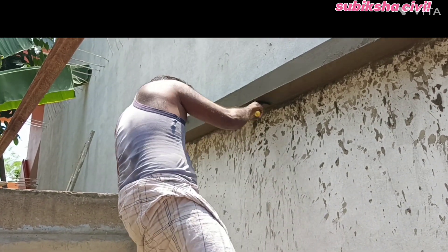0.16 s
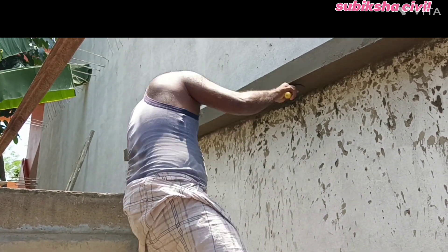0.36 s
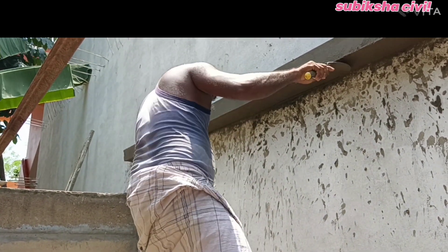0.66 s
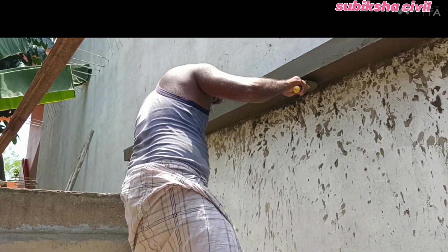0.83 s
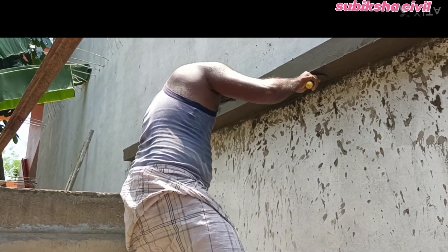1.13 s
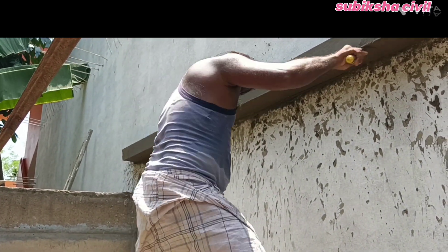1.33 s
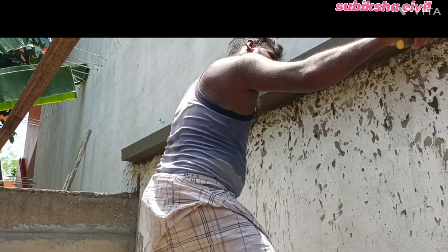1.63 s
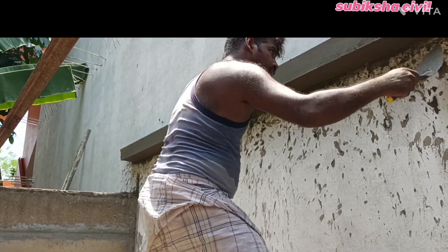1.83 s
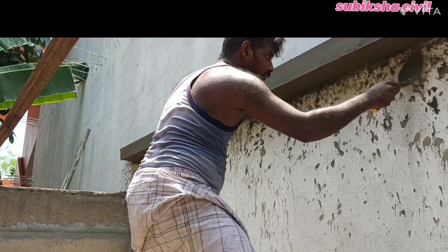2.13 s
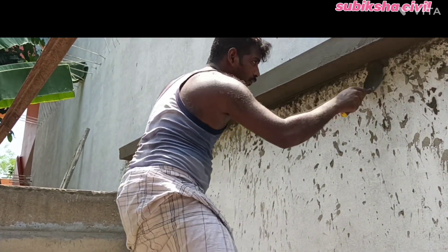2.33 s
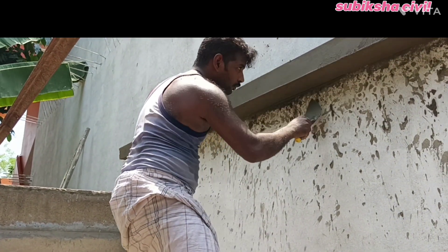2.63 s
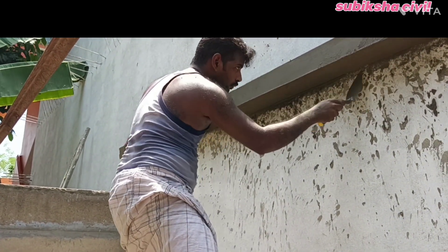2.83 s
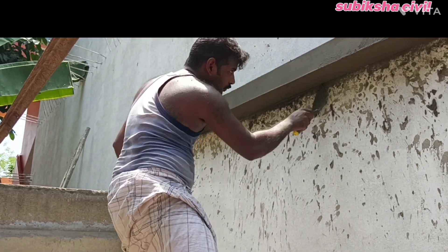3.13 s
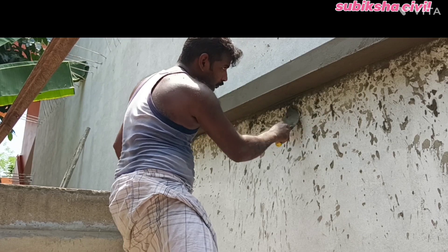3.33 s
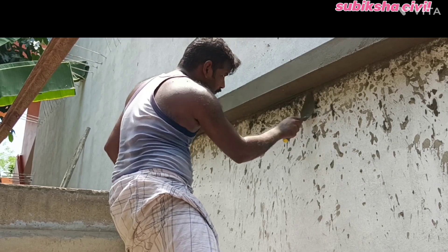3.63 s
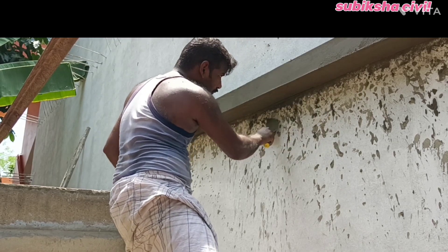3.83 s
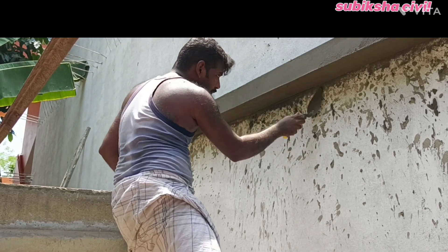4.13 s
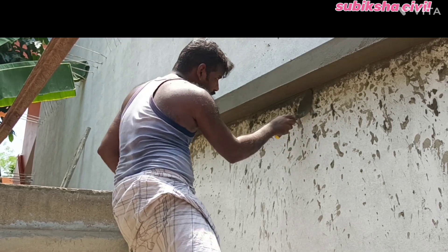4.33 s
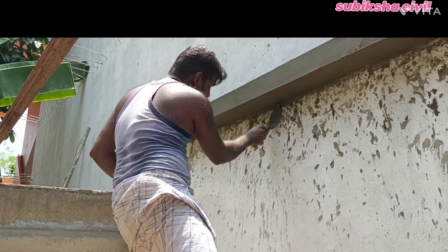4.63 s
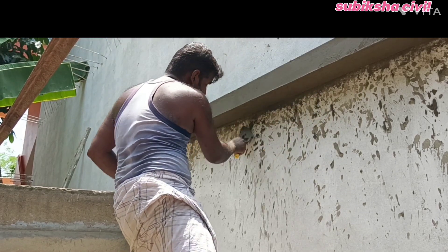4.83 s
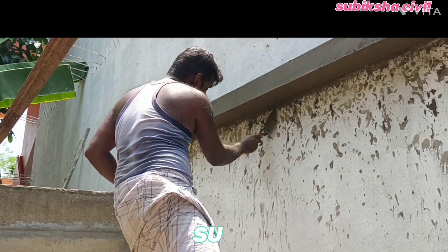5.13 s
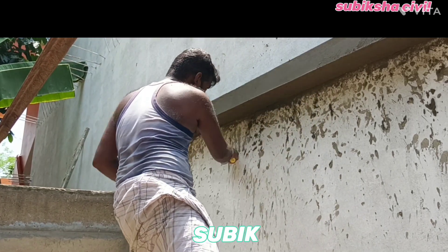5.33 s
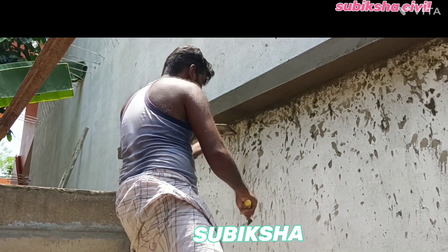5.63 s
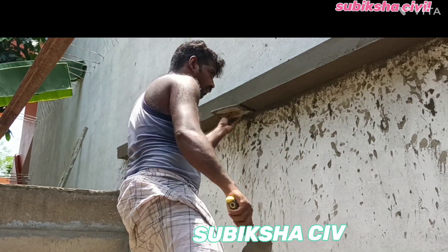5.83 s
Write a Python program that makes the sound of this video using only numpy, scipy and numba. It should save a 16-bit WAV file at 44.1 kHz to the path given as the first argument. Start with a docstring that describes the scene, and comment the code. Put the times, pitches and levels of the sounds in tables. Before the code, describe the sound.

A steel trowel rasps and rings over wet plaster in repeated strokes, while a motorbike passes near the end.

```python
"""One rasping scrape after another: a mason spreads cement plaster on an outdoor wall with a steel float.
Sand grains crackle under the blade; laid flat it hisses, set on its edge it taps and rings.
Lumps of wet mortar crunch softly, and the nearby walls add a short echo.
A single-cylinder motorbike comes up the street, its exhaust barking with each firing, then booming
as the throttle shuts. Far traffic hums underneath."""
import sys
import numpy as np
from scipy import signal
from scipy.fft import rfft, irfft, next_fast_len
from scipy.io import wavfile
from scipy.ndimage import uniform_filter1d, map_coordinates
from numba import njit

SR = 44100
rng = np.random.default_rng(int(sys.argv[2]) if len(sys.argv) > 2 else 0)


def wrap_up_sound(samples):
    """Save the sound to the file named by the first command line argument, as 16-bit audio."""
    columns = np.atleast_2d(samples).T
    # keep every value between -1 and 1, then stretch to whole-number steps
    tamed = np.clip(columns, -1, 1)
    steps = np.round(tamed * 32767).astype(np.int16)
    wavfile.write(sys.argv[1], SR, steps)


N = 263718

# the free blade's modes (the tones it rings at): f/Hz, level/dB, t60/s (time to fade by 60 dB)
BLADE_MODES = [(1194.6, -1, 0.19), (1904, -9.5, 0.18), (2020, -12.5, 0.19), (2770, -19, 0.055),
               (3350, -21, 0.09), (3900, -16, .04)]


def strokes():
    """Sand under the blade hisses and sets the steel ringing; the hand's pressure sets both."""
    # hiss of the sand: f/Hz, level/dB
    sand_spectrum = [(500, -49), (1000, -4), (2000, -27), (3500, 1), (4600, 5), (5400, 3.5), (7300, 5),
                     (9000, 2), (12000, 5), (15700, 4)]
    # sizzle of the finest sand: f/Hz, level/dB
    fine_spectrum = [(6000, -42), (9500, -16), (12500, -22), (14000, 0), (15700, 0)]
    # modes of the blade laid flat: f/Hz, width/Hz, level/dB, share of the bending (0-1)
    flat_modes = [(220, 87, -4.5, 0), (451, 120, -2.5, 0), (670, 134, -8.5, .3), (1200, 62, 3.5, 1),
                  (1505, 95, 0.5, 0.8), (1740, 210, -4, .3), (1974, 70, 6, 0.1), (2440, 460, -1, 0.8),
                  (3070, 340, -1, 0), (3320, 66, 6.5, 0.4), (3630, 90, -2, 0.3), (4260, 120, -2, 0.3)]
    # modes of the blade on its edge: same columns
    edge_modes = [(222, 55, -10, 0), (415, 128, -15, 0), (770, 170, -9, 0.93), (1195, 48, 4, 0.98),
                  (1495, 44, 4.3, 0.98), (1975, 54, 7.6, 0.3), (2210, 167, 1.5, 0), (2620, 344, -3.5, 0),
                  (2820, 250, -1, 0.42), (3250, 137, 1, 0.14), (3600, 270, -9.5, 0.13),
                  (3950, 150, 0, 0.49)]
    hiss_db, ring_db, flex, sizzle_db, tip_db = hand()
    sand = grit()
    coarse = coloured(patchy(sand, depth_db=2.6), sand_spectrum)
    spurts = patchy(grit(), depth_db=2.6) * amp(2.6 * wobble(70))
    rasp = coarse + amp(sizzle_db) * coloured(spurts, fine_spectrum)
    flat_ring = amp(2.5) * blade(sand, flat_modes, flex, tip_db)
    edge_ring = amp(1.0) * blade(sand, edge_modes, flex, tip_db)
    ring = np.where(np.arange(N) / SR < 2.0, flat_ring, edge_ring)  # flat for the first 2 s
    tremor = amp(0.8 * wobble(35))  # the hand never presses quite evenly
    return tremor * (amp(hiss_db + 2) * rasp + amp(ring_db) * ring)


def hand():
    """Each stroke lands, grips, pushes and lets go; gives curves of hiss, ring, flex, sizzle and tip."""
    # strokes: t/s, rise/s, push/s, landing/dB, grip/dB, end of push/dB, mid-push swell/dB,
    # release/(dB/s), ring boost/dB, pitch rise from bending/Hz, sizzle/dB, freedom of the tip/dB
    moves = [ (0.355, 0.253, 0.333, -45, -27.8, -27, -5, 260, -8, 64, 1, -0.5),
             (1.383, 0.179, 0.289, -46, -33, -32.5, 5.2, 245, -10, 64, -2, -2),
             (2.435, 0.025, 0.496, -42, -31.6, -27.8, 1.3, 298, -1, 72, -8, 1.5),
             (3.255, 0.067, 0.319, -38, -30.3, -25.8, 1.5, 244, 0.3, 74, -14, 0.5),
             (3.912, 0.1, 0.178, -54, -31, -25, 2.8, 190, 0.8, 96, -6.5, -2.5),
             (4.466, 0.005, 0.095, -40, -31, -38.6, -0.8, 174, 2.2, 56, -15, -1),
             (4.61, 0.089, 0.445, -44.3, -31.5, -24.3, -0.1, 252, 0.6, 62, -18, -3.5),
             (5.555, 0.044, 0.108, -42, -24.5, -29.7, 3, 275, 1, 58, -17, -6), ]
    # the edge digs into coarser mortar and the ring surges: t/s, half length/s, surge/dB
    bites = [(1.797, 0.026, 7.7), (2.84, 0.04, 4.3), (3.592, 0.028, 5), (4.167, 0.024, 4.2),
             (5.07, 0.025, 4.7), (5.139, 0.012, 3.8), (5.66, 0.015, 3.5)]
    landing_s, slack_hz = 0.025, 1143  # time to meet the wall; lowest mode of the unbent blade
    trail_db, trail_db_per_s = -24, 120  # the blade still drags lightly after letting go
    clog_db_per_s = 5  # mortar gathers on the tip and mutes it
    clock = np.arange(N) / SR
    controls = np.outer([-120, -120, 0, 0, 0], np.ones(N))
    bite_db = sum(db * np.exp(-((clock - s) / half_s) ** 2) for s, half_s, db in bites)
    for (s, rise_s, push_s, land_db, grip_db, end_db, swell_db,
         release, boost_db, flex_hz, sizzle_db, tip_db) in moves:
        t = clock - s
        pushed = np.clip((t - rise_s) / push_s, 0, 1)
        after_s = np.maximum(t - rise_s - push_s, 0)
        level_db = np.interp(t, [0, rise_s, rise_s + push_s], [land_db, grip_db, end_db])
        level_db += swell_db * np.sin(np.pi * pushed)
        level_db += np.maximum(-release * after_s, trail_db - trail_db_per_s * after_s)
        level_db += 20 * np.log10(np.clip(t / landing_s, 1e-3, 1))
        top_db = level_db.max()
        hiss_db = level_db + 0.3 * bite_db
        # as the touch lightens, the ring drops less than the hiss
        ring_db = top_db + boost_db + 0.78 * (level_db - top_db) + bite_db
        bent_hz = slack_hz + flex_hz * amp(1.15 * (hiss_db - top_db))  # pressure raises the pitch
        flex = bent_hz / BLADE_MODES[0][0] - 1
        clog_db = clog_db_per_s * push_s * pushed
        stroke = [hiss_db, ring_db, flex, np.full(N, sizzle_db), tip_db - clog_db]
        controls = np.where((t >= 0) & (hiss_db > controls[0]), stroke, controls)  # the louder one wins
    return controls


def grit():
    """Countless sand grains snap under the steel over a hiss of fine ones; the blade catches and slips."""
    snaps_per_s = 6000
    snaps = (rng.random(N) < snaps_per_s / SR) * amp(2 * np.minimum(rng.exponential(size=N), 3))
    grains = .62 * unit(snaps * noise()) + noise()
    catch_db = .9 * wobble(60) + .6 * wobble(260)
    return unit(grains * amp(catch_db))


def patchy(x, depth_db):
    """Narrow bands of the hiss swell and fade at random, giving it a flickering, patchy texture."""
    bands = signal.stft(x, nperseg=512)[2]
    patches = uniform_filter1d(rng.standard_normal(bands.shape), size=3, axis=1)  # smooth over pitch
    patches = unit(uniform_filter1d(patches, size=9, axis=2))  # and over time
    return signal.istft(bands * amp(depth_db * patches), nperseg=512)[1][:, :N]


def blade(sand, modes, flex, tip_db):
    """Grains ring the blade's modes, which rise as it bends; those that bend the tip shift and damp most."""
    steel = np.zeros((2, N))
    for hz, width, db, share in modes:
        moving_hz = hz * (1 + share * flex + .005 * wobble(12))
        gain = amp(db + share ** 2 * tip_db + 1.47 * wobble(16))
        steel += gain * np.array([resonate(side, moving_hz, float(width)) for side in sand])
        steel = -steel  # neighbouring modes swing in opposite directions
    return unit(filtered(steel, lambda hz: 1 / (1 + (hz / 5500) ** 4)))


def taps():
    """Each touch of the edge ticks, crushes grains and rings the blade, higher the harder it is held."""
    # the edge meets the wall: t/s, level/dB, ring boost/dB, lowest mode/Hz
    touches = [(1.367, -37, -18, 1170), (1.395, -33.5, -7, 1142), (2.371, -32, 14, 1179),
               (2.392, -33, 3, 1204), (2.412, -41, -4, 1205), (2.461, -27.5, 9.5, 1142),
               (2.957, -30, 10.5, 1148), (3.261, -28.5, -9, 1110), (3.672, -39.5, 10, 1124),
               (3.916, -39, 5, 1110), (4.098, -19, -9, 1200), (4.183, -25, -6, 1280), (4.47, -18, -8, 1180)]
    tick_t60_s, crunch_t60_s = 0.016, 0.08
    out, t = np.zeros((2, N + SR)), np.arange(SR // 3) / SR
    damping = 0.45 + 0.71 * np.exp(-(t / 0.01) ** 2)  # the mortar takes most of the swing at once
    onset = 1 - np.exp(-t / 0.0024)
    for s, db, ring_db, lowest_hz in touches:
        pitch = lowest_hz / BLADE_MODES[0][0]
        ring = 0
        for hz, mode_db, t60 in BLADE_MODES:
            fade = amp(mode_db + rng.normal(0, 1) - 60 * t / t60)
            ring += fade * np.sin(2 * np.pi * (hz * pitch * t + 0.87 * rng.random((2, 1))))
        crunch = .5 * amp(-60 * t / crunch_t60_s) * rng.standard_normal((2, len(t)))
        tick = amp(-1.5 - 60 * t / tick_t60_s) * rng.standard_normal((2, len(t)))
        tap = tick + onset * (crunch + amp(ring_db) * damping * ring)
        out[:, round(s * SR):][:, :len(t)] += amp(db) * tap
    return filtered(out[:, :N], lambda hz: 1j * hz / (1j * hz + 350))  # a thin blade gives little bass


def lumps():
    """Lumps of wet mortar give way under the blade with a soft, low crunch."""
    # squashed lumps: t/s, level/dB, t60/s
    squashes = [(0.655, -42, 0.38), (0.81, -42, 0.19), (0.885, -40.5, 0.46), (1.6, -40.5, 0.3),
                (1.716, -28, 0.1), (1.756, -40, 0.15), (1.795, -38.5, 0.38), (3.261, -39.5, .15),
                (3.5, -39, 0.16), (3.917, -35.5, 0.086), (4.472, -35, 0.6)]
    # crunch of thick mortar: f/Hz, level/dB
    mortar_spectrum = [(100, -32), (180, 5), (240, 13), (310, -16), (480, -15), (580, 2), (700, 5.5),
                       (950, 3), (1800, -18), (4000, -15), (9000, -45)]
    push, t = np.zeros(N + SR), np.arange(SR // 2) / SR
    onset = 1 - np.exp(-t / 0.0013)
    for s, db, t60 in squashes:
        push[round(s * SR):][:len(t)] += amp(db - 60 * t / t60) * onset
    return push[:N] * coloured(grit(), mortar_spectrum)


def wipes():
    """The flat of the blade smears soft mortar in light, dull swishes that swell and fade."""
    # swishes: peak t/s, level/dB, rise/(dB/s), fall/(dB/s)
    swishes = [(0.392, -38.5, 230, 130), (1.79, -37, 150, 130), (2.162, -35, 240, 320)]
    # smearing mortar: f/Hz, level/dB
    smear_spectrum = [(240, -46), (400, -23), (520, -24), (598, -11), (1180, -7), (2250, 1.5), (2970, -5),
                      (3210, 0.5), (16000, -34)]
    t = np.arange(N) / SR
    level = sum(amp(db - np.maximum(rise * (s - t), fall * (t - s))) for s, db, rise, fall in swishes)
    return level * coloured(noise(), smear_spectrum)


def motorbike():
    """A bike passes: its exhaust barks, then booms as the throttle shuts; the valves clatter in step."""
    # engine speed: t/s, firing rate/Hz
    firing_rate = [(4.2, 26.8), (4.8, 27.4), (5.42, 27.3), (5.66, 25.8), (5.98, 25.1)]
    # exhaust under throttle: f/Hz, level/dB
    pipe_spectrum = [(80, -29), (110, -15), (137, -4.5), (164, 1), (191, 5.5), (218, 0), (246, -8.5),
                     (275, -15), (305, -16), (355, -9.5), (430, -63)]
    # boom of the silencer: f/Hz, level/dB
    silencer_spectrum = [(70, -55), (90, -10), (100, 0), (135, 0), (300, -45), (900, -100)]
    # valves and tyres: f/Hz, level/dB
    rattle_spectrum = [(240, -34), (400, 0), (553, 1.5), (935, 2), (1230, 1), (1420, -2), (1760, 3.5),
                       (2320, 2.5), (2550, -3.5), (6240, -17.5), (7170, -19), (8900, -24), (16000, -24.5)]
    nearest_s, pass_s = 5.27, 0.5  # when it is closest; the time it takes to ride that distance
    t = np.arange(N) / SR
    firing_hz = np.interp(t, *np.transpose(firing_rate)) * (1 + 0.00318 * wobble(12))
    firings = np.cumsum(firing_hz) / SR
    near = np.hypot(1, (t - nearest_s) / pass_s) ** -1.85
    open_s, shut_s = 3.9, 5.5  # the throttle opens slowly and shuts fast
    opened, shut = ramp(open_s, length_s=0.5), ramp(shut_s, length_s=0.07)

    def harmonic(k):
        """A tone at k times the firing rate; echoes between houses make its level and phase drift."""
        gain = amp(2.43 * wobble(6.34))
        return gain * np.sin(2 * np.pi * (k * firings + rng.random()) + .5 * wobble(7))

    mean_hz = np.mean(firing_rate, axis=0)[1]
    tones = sum(amp(along(pipe_spectrum, k * mean_hz)) * harmonic(k) for k in range(3, 17))
    throb = amp(0.74 * np.cos(2 * np.pi * firings))
    gas = 0.3 * coloured(noise()[0], pipe_spectrum + [(700, -49), (1500, -90)])
    bark = amp(-26.5 - 8 * (1 - opened + shut)) * throb * (unit(tones) + gas)
    boom_db = -26.5 - 24 * (1 - ramp(shut_s, length_s=0.16))
    boom = amp(boom_db) * (unit(harmonic(4)) + .75 * coloured(noise()[0], silencer_spectrum))
    drone = amp(-50.3) * near ** 0.5 * unit(harmonic(2))  # the lowest tone carries furthest
    clatter = amp(-35 - 2 * shut) * unit(throb * coloured(noise(), rattle_spectrum))
    return near * (bark + boom) + drone, near * clatter


def street():
    """Far traffic hums under a faint hiss of open air."""
    # traffic hum: f/Hz, level/dB
    traffic_spectrum = [(15, -52), (25, -31), (43, -16), (70, -11), (90, -4.5), (141, 4), (190, -2),
                        (232, -5), (320, -13), (420, -54), (700, -120)]
    # open air: f/Hz, level/dB
    air_spectrum = [(220, -39), (380, -8), (496, -6), (711, -13.5), (1460, -15.5), (1600, -7), (1680, -43),
                    (1790, -10), (2190, -13), (2330, -14), (16000, -37.5)]
    hum = amp(-49.3 + 1.1 * wobble(7)) * coloured(noise(), traffic_spectrum)
    air = amp(-54.5 + 0.44 * wobble(2.47)) * coloured(noise(), air_spectrum)
    return hum + air


def yard(x):
    """The nearby walls echo briefly, the treble dying first."""
    # how long the echo lasts: f/Hz, t60/s
    echo_times = [(200, 0.32), (2000, 0.27), (8000, 0.13), (15000, 0.06)]
    hz, t, bands = signal.stft(rng.standard_normal((2, SR // 2)), SR, nperseg=256)
    fade = amp(-60 * t / along(echo_times, hz)[:, None])
    tail = signal.istft(bands * fade, SR, nperseg=256)[1]
    return signal.fftconvolve(x, tail / np.linalg.norm(tail[0]), axes=1)[:, :N]


def stereo(pair):
    """Two unrelated signals become left and right: alike in the bass, shaded unevenly in the treble."""
    # how alike the sides are: f/Hz, likeness (0-1)
    likeness = [(150, .94), (400, 0.65), (800, 0), (1800, 0.1), (3500, 0.12), (6000, 0.22), (7500, .65),
                (9000, 0.4), (10500, 0.33), (15000, 0.22)]
    # balance: f/Hz, left minus right/dB
    balance = [(200, -.3), (1200, -2.5), (2300, -.5), (3900, -5.5), (5100, -1), (6300, -6), (8000, -3.5),
               (9600, 4), (11600, 3.5), (13200, 12), (15000, -3.5)]
    angle = lambda hz: np.arccos(np.clip(along(likeness, hz), -1, 1)) / 2
    mid, side = filtered(pair, lambda hz: np.array([np.cos(angle(hz)), np.sin(angle(hz))]))
    left_right = np.array([mid + side, mid - side])
    return filtered(left_right, lambda hz: amp(np.outer([.5, -.5], along(balance, hz))))


def amp(db):
    """Turn decibels into a gain."""
    return 10 ** (np.asarray(db) / 20)


def unit(x):
    """Scale x to an average (rms) level of 1."""
    return x / np.sqrt(np.mean(x ** 2) + 1e-20)


def along(points, hz):
    """Read the value at hz between (Hz, value) points, on a log frequency axis."""
    f, v = np.transpose(points)
    return np.interp(np.log(hz + 1), np.log(f), v)


def ramp(start_s, length_s):
    """A straight rise from 0 to 1."""
    return np.clip((np.arange(N) / SR - start_s) / length_s, 0, 1)


def wobble(rate):
    """A smooth curve through `rate` random values a second."""
    return map_coordinates(rng.standard_normal(int(N * rate / SR) + 4), [np.arange(N) * rate / SR])


def noise():
    """Two unrelated white noises."""
    return rng.standard_normal((2, N))


def filtered(x, response):
    """Multiply each frequency in x by response(hz)."""
    size = next_fast_len(N + SR // 2)
    return irfft(rfft(x, size) * response(np.fft.rfftfreq(size, 1 / SR)), size)[..., :N]


def coloured(x, spectrum):
    """Shape x with a spectrum of (Hz, dB) points, then scale it to level 1."""
    return unit(filtered(x, lambda hz: amp(along(spectrum, hz))))


@njit
def resonate(x, hz, width):
    """x rings one resonance whose frequency can move from sample to sample."""
    y, state = np.zeros(len(x)), 0j
    keep = np.exp(-np.pi * width / SR)
    for i in range(len(x)):
        state = state * keep * np.exp(2j * np.pi * hz[i] / SR) + (1 - keep) * x[i]
        y[i] = state.real
    return y


def scene():
    """The mason works in the yard, with the street behind and the exhaust off to one side."""
    work = strokes() + taps() + lumps() + wipes()
    exhaust, clatter = motorbike()
    lag_s = 0.00033  # the exhaust reaches the left side later
    left_lag = lambda hz: np.exp(2j * np.pi * np.outer([-.5, .5], hz) * lag_s)
    return stereo(work + amp(-10) * yard(work) + clatter + street()) + filtered(exhaust, left_lag)


def record(dry):
    """Cut off the very highest treble."""
    top_hz, fade_hz = 15950, 200
    return filtered(dry, lambda hz: np.clip((top_hz - hz) / fade_hz + .5, 0, 1))


dry = scene()
out = record(dry)
wrap_up_sound(out)
```